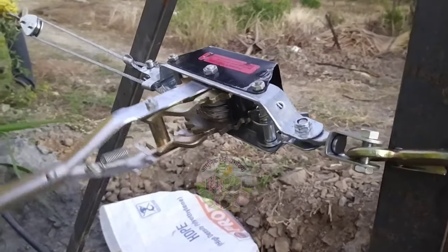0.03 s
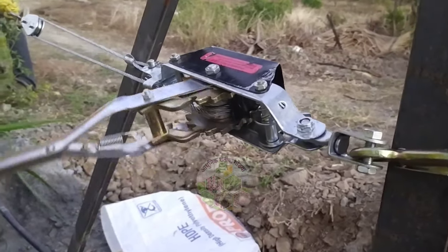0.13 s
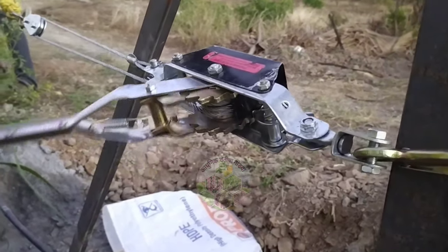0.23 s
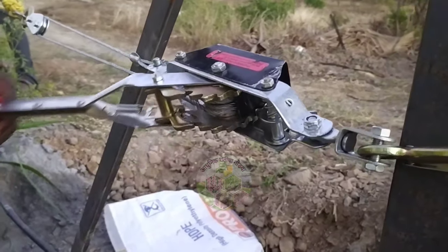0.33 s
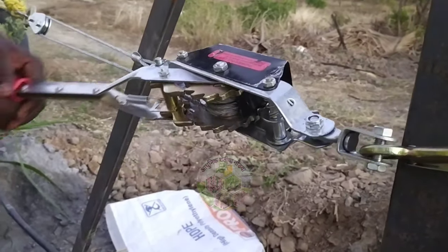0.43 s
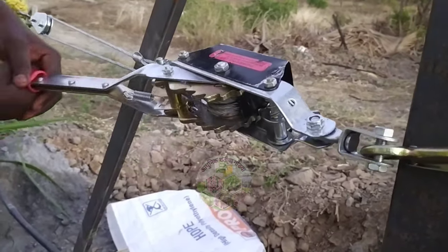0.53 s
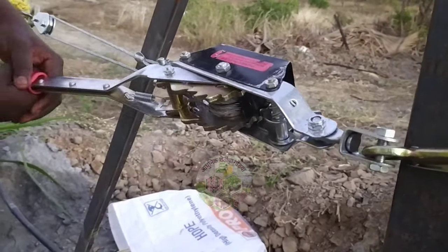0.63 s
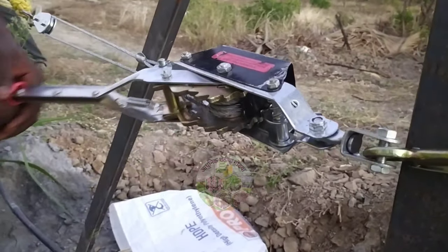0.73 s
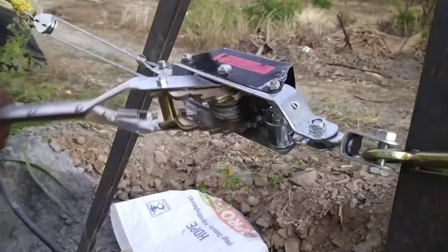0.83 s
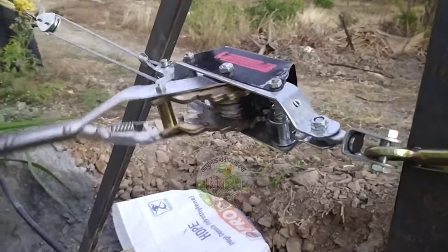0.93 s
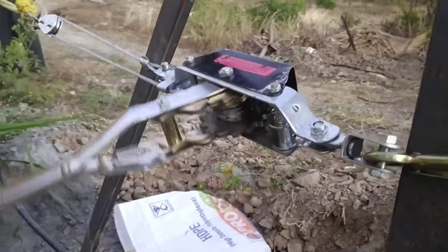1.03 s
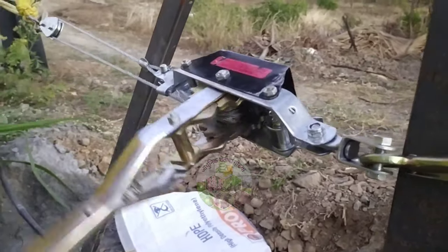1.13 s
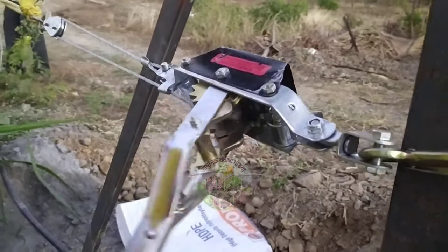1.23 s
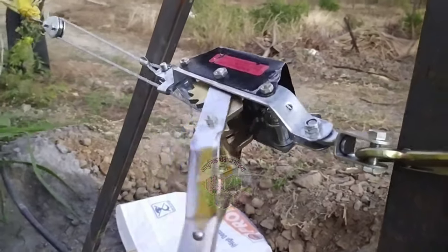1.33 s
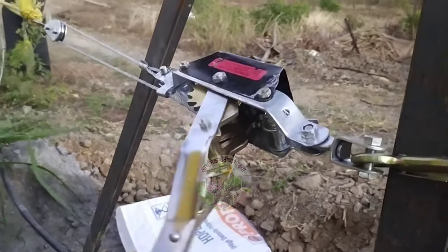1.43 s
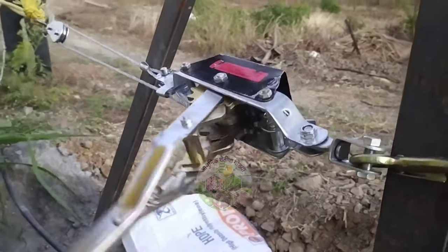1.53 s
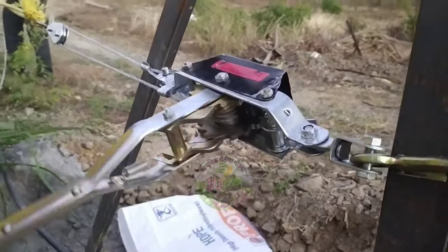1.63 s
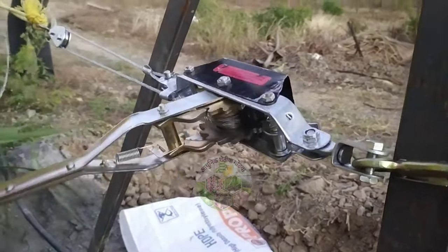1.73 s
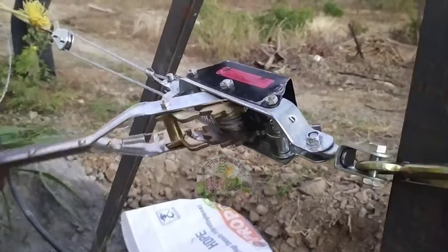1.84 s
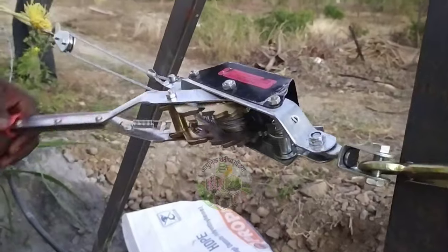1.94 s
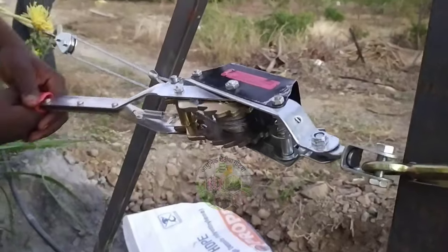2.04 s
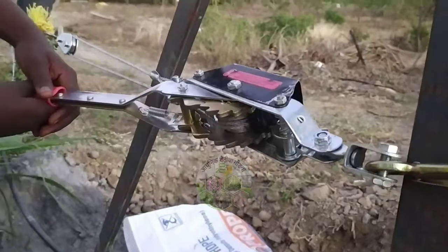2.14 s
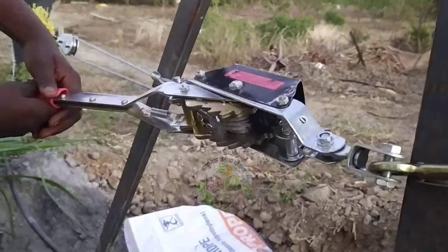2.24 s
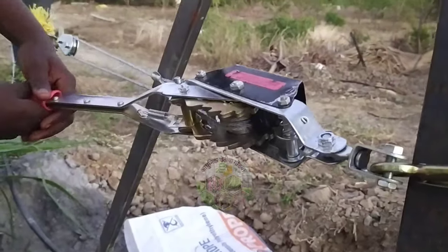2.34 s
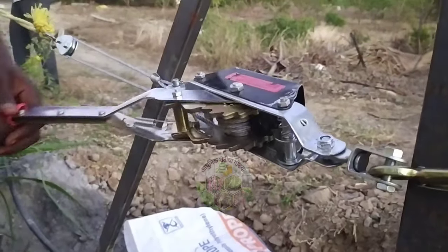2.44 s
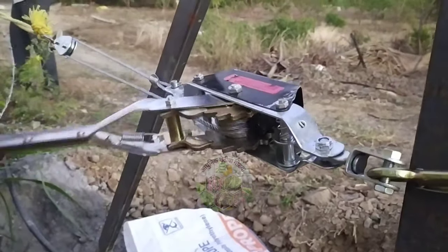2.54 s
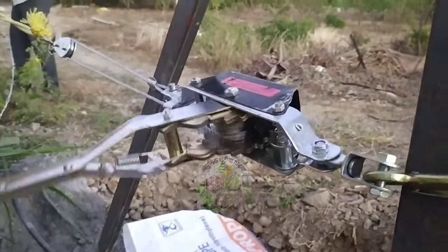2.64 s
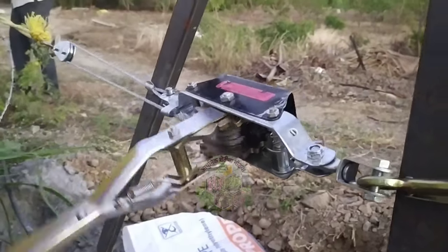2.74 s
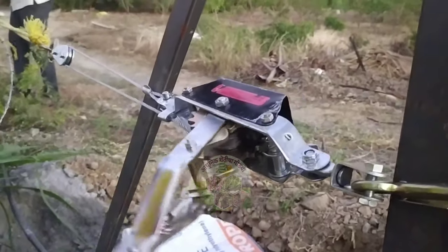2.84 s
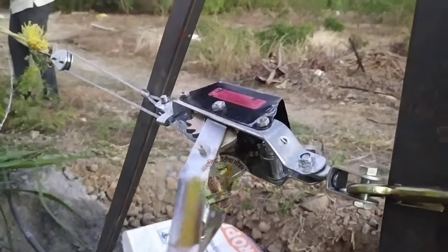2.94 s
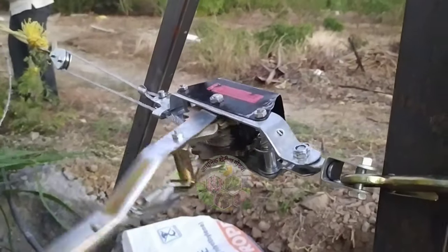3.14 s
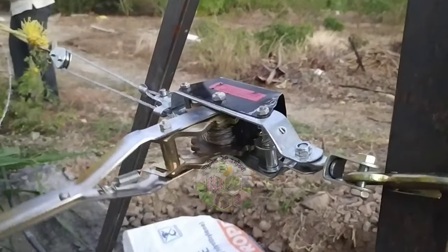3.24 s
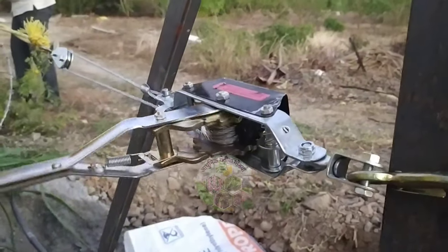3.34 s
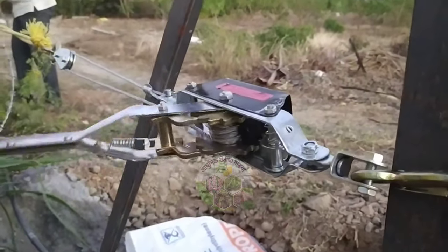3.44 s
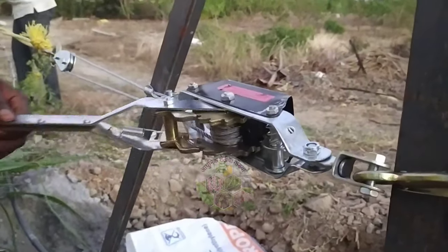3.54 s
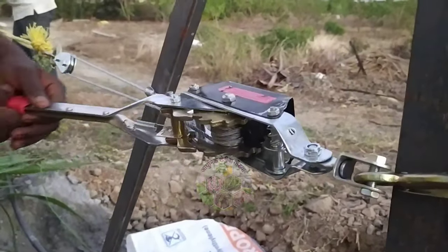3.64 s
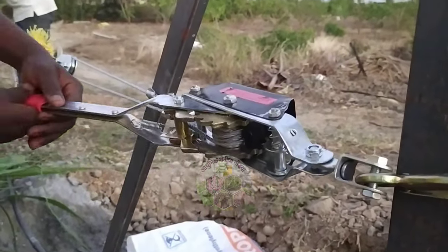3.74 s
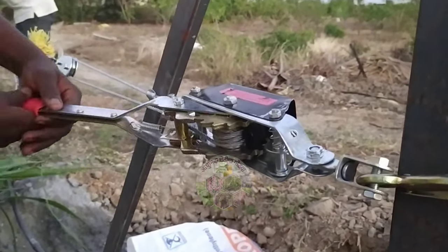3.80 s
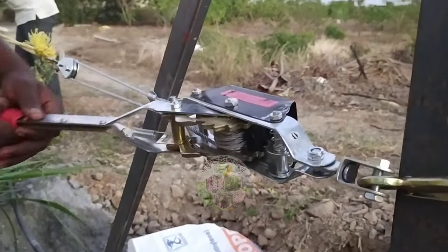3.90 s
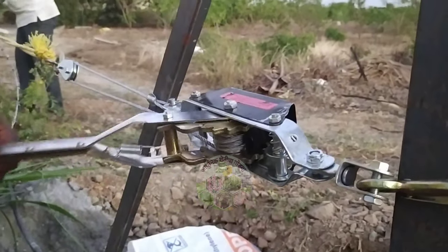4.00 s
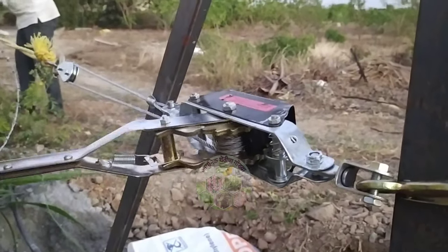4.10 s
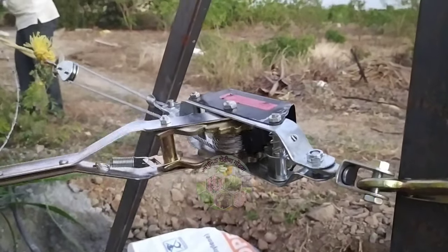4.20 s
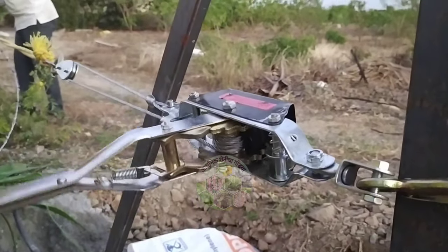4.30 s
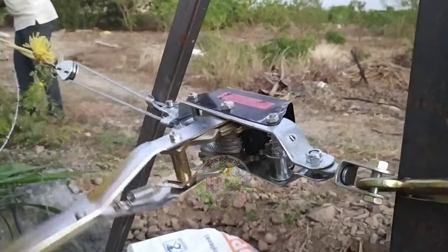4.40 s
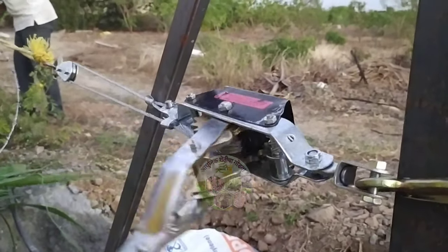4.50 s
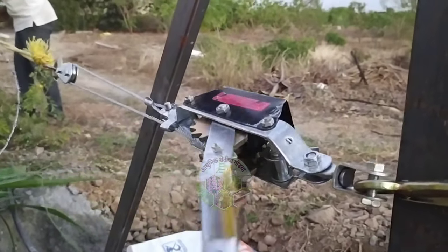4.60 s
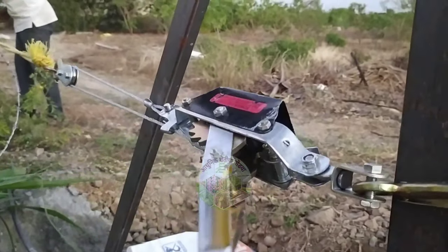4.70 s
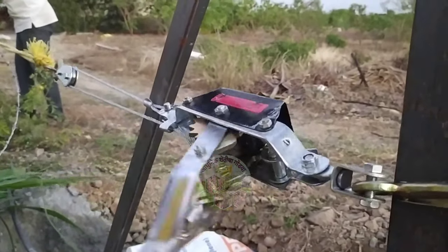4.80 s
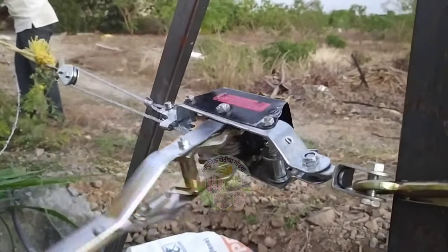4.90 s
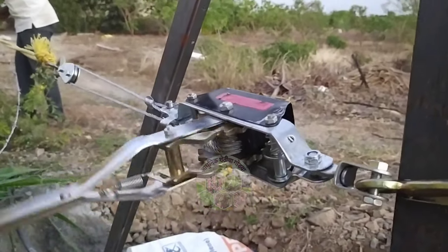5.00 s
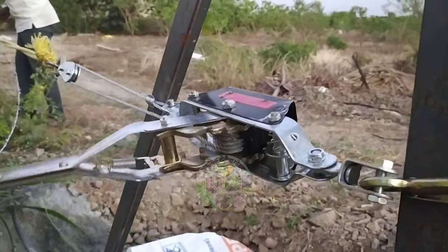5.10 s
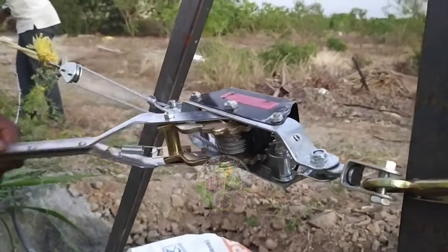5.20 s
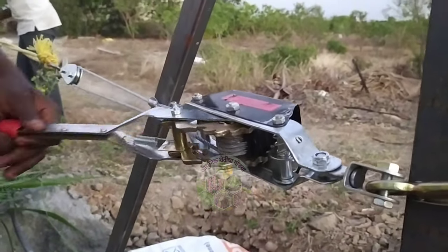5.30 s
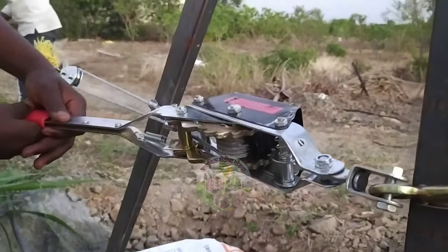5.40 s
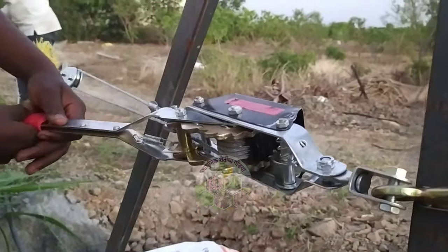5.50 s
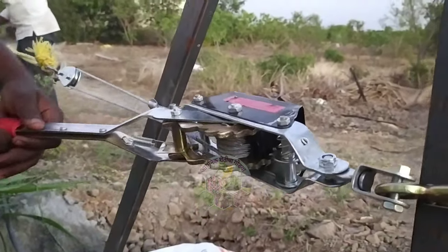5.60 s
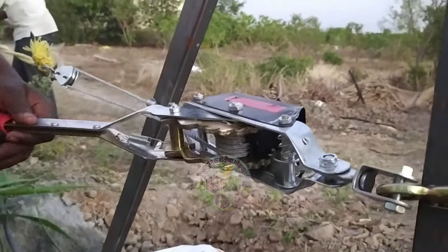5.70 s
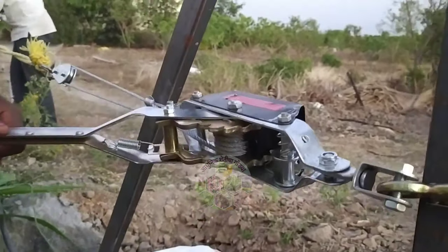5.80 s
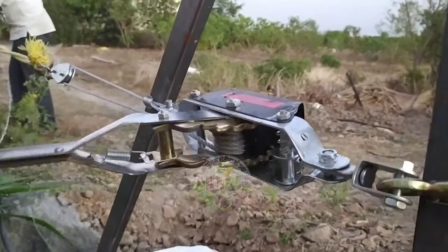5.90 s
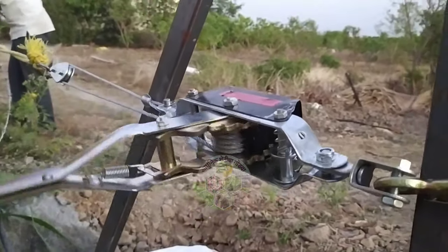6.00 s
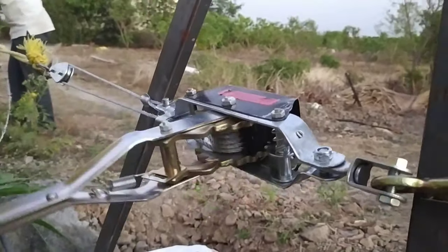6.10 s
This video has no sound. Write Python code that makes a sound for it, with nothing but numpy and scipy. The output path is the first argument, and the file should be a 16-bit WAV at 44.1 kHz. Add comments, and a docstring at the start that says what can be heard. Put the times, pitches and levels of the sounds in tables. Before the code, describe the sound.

A steel ratchet puller is worked by hand in an open, quiet field, very close to a handheld stereo microphone. Two heavy clacks at 0.1 and 0.3 s and a softer one at 0.5 open the pull; a knock follows around 0.75, then three back-stroke clicks from 1.0 to 1.2 with dull bumps and a scraping tail. A knock at 1.6 leads to pull clicks at 1.75, 1.9 and 2.1. Rasping swells before a loud, bright, ringing burst at 2.6-2.9. More rubbing, a knock at 3.2, clacks at 3.4 and 3.5, then small ticks near 3.7 and a knock at 4.06. Three back-stroke clicks ring from 4.4 to 4.6, a rattle at 4.8, and four pull clacks from 5.0 to 5.4. After a short lull, scraping returns and two strong clicks end it around 6.0. High insect chirps pulse faintly throughout, a nearer one joining after 5.6.

```python
"""Ratchet puller tightening a fence wire

A hand-cranked steel ratchet puller works in an open field, close to a hand-held camera.
Its pawls click and chatter as gritty noise bursts, while frame and wire ring as fading tones.
Filtered noise makes the scraping between clicks, and wavering tones make the lever and drum sing.
Two insects chirp in short falling tones, back-stroke clicks jolt the microphones, and the field hushes."""
import sys
import numpy as np
from scipy import signal
from scipy.fft import rfft, irfft
from scipy.io import wavfile
from scipy.ndimage import uniform_filter1d

SR = 44100
rng = np.random.default_rng(int(sys.argv[2]) if len(sys.argv) > 2 else 0)


def persist_wave(psi):
    """Save psi, clipped to +-1, as 16-bit WAV."""
    counts = np.round(np.clip(psi, -1, 1) * 32767).astype(np.int16)
    wavfile.write(sys.argv[1], SR, np.atleast_2d(counts).T)


N = 271215


def gain_of(db):
    """Turns decibels into a factor."""
    return 10 ** (np.asarray(db) / 20)


def evened(x):
    """Scales a sound to rms 1."""
    return x / np.sqrt(np.mean(x ** 2) + 1e-20)


def read(points, hz):
    """Reads a curve between its points on a log-frequency axis."""
    f, value = np.transpose(points)
    return np.interp(np.log(hz + 1), np.log(f + 1), value)


def add(mix, s, sound):
    """Adds a sound at a time in seconds, cut off where the mix ends."""
    part = mix[..., round(s * SR):][..., :sound.shape[-1]]
    part += sound[..., :part.shape[-1]]


def coloured(x, db_of):
    """Filters a sound by a rule that gives the dB at each frequency."""
    size = x.shape[-1]
    return irfft(rfft(x) * gain_of(db_of(np.fft.rfftfreq(size, 1 / SR))), size)


def step(hz, edge_hz, steep):
    """Falls from 1 below the edge to 0 above it."""
    return 1 / (1 + (hz / edge_hz) ** steep)


def drift(rate, rows):
    """Random drift, a row each: straight lines between random points of spread 1, `rate` per second."""
    knots = rng.standard_normal((rows, round(N / SR * rate) + 2))
    place = np.arange(N) / SR * rate
    return np.array([np.interp(place, np.arange(len(k)), k) for k in knots])


def smooth_patches(noise, bins, frames):
    """Smooths random numbers over neighbouring frequencies and times into patches of rms 1."""
    across = uniform_filter1d(noise, size=bins, axis=0)
    return evened(uniform_filter1d(across, size=frames, axis=1))


def patchy(x, depth_db):
    """Lifts and lowers patches of about 300 Hz by 40 ms at random."""
    z = signal.stft(x, nperseg=512, noverlap=384)[2]
    patches = smooth_patches(rng.standard_normal(z.shape[1:]), bins=4, frames=12)
    return signal.istft(z * gain_of(depth_db * patches), nperseg=512, noverlap=384)[1][:, :x.shape[1]]


def pair_noise(size, shared, grit_db):
    """Gritty noise at both microphones: a shared part, late on the left, and a part of their own."""
    late = 12  # samples by which the tool reaches the left microphone later
    common, left, right = rng.standard_normal((3, size))
    wobble = np.sqrt(12) * uniform_filter1d(rng.standard_normal(size), size=12)
    grit = gain_of(grit_db * wobble)
    own = np.sqrt(1 - shared ** 2)
    at_left = (shared * common + own * left) * grit
    at_right = (shared * common + own * right) * grit
    return np.array([np.roll(at_left, late), at_right])


def field():
    """Distant open-air hush: noise shaped in frequency, with drifting patches."""
    # colour of the hush: (frequency [Hz], relative level [dB per Hz])
    hush_colour = [(18, -30), (30, 24.5), (116, -10.5), (190, 8.5), (774, 2), (978, 4), (1600, -7),
                   (1870, -1), (2310, -20), (5300, -1.5), (7060, 5.5), (9150, -7), (15000, -54)]
    # how alike left and right are: (frequency [Hz], likeness [0 to 1])
    likeness = [(60, 0.63), (300, 0.94), (800, 0.93), (2000, 0.033), (15000, 0.088)]
    level_db = -53
    frames, hz = N // 256 + 5, np.fft.rfftfreq(1024, 1 / SR)
    a, b, c, d, noise = rng.standard_normal((5, 513, frames))
    patches = smooth_patches(noise, bins=8, frames=14)
    same = read(likeness, hz)[:, None]
    left = a + 1j * b
    right = same * left + np.sqrt(1 - same ** 2) * (c + 1j * d)
    z = np.array([left, right]) * gain_of(read(hush_colour, hz)[:, None] + 2.5 * patches)
    hush = signal.istft(z, nperseg=1024, noverlap=768)[1][:, :N]
    return gain_of(level_db) * evened(hush)


def chirp(length_s, top_hz, fall_hz):
    """One wing stroke: a short falling tone."""
    t = np.arange(round(length_s * SR)) / SR
    turn = 2 * np.pi * np.cumsum(top_hz - fall_hz * t / length_s) / SR
    return signal.windows.tukey(len(t), .7) * np.sin(turn)


def insects():
    """A steady far singer with two strong wing strokes and a weak one; a nearer one joins late."""
    # pace of the far insect: (time [s], chirp groups sung so far [count])
    far_beat = [(0.034, 0), (0.754, 11), (1.257, 19), (1.936, 29), (2.383, 36), (2.972, 45), (3.837, 58),
                (4.625, 70), (5.016, 76), (5.486, 83), (5.728, 87), (6.119, 93)]
    # its typical level on the left, faint where knocks cover it: (time [s], level [dB])
    far_level = [(0.0, -41), (1.0, -42), (1.4, -39), (3.5, -38), (3.69, -55), (3.78, -59), (3.82, -42),
                 (4.2, -41), (4.7, -38.5), (5.56, -37.5), (5.6, -64), (5.68, -60), (5.72, -38), (6.15, -43)]
    # single chirps of the near insect, on the left: (time [s], level [dB])
    near_chirps = [(5.66, -33), (5.683, -32.5), (5.758, -32), (5.846, -32.5), (5.951, -31), (6.027, -33)]
    far, near = np.zeros((2, N))
    beat_s, groups = np.transpose(far_beat)
    starts = np.interp(np.arange(groups[-1] + 1), groups, beat_s)
    levels = np.interp(starts, *np.transpose(far_level)) + 2.5 * rng.standard_normal(len(starts))
    for s, db in zip(starts, levels):
        for late_s, stroke_db in ((0, 0.5), (.0205, 0), (.04, -10)):
            add(far, s + late_s, gain_of(db + stroke_db) * chirp(0.01145, 7850, 1550))
    for s, db in near_chirps:
        add(near, s, gain_of(db) * chirp(0.012, 7900, 1740))
    right = gain_of(-10) * (np.roll(far, 1) + near)  # the right hears both more softly
    return np.array([far + near, right])


def jolts():
    """Each shock pushes the membranes back; the slow swing after it is the bass cut settling."""
    # shocks through the camera body, before the bass cut: (time [s], left level [dB], right level [dB])
    shocks = [(0.983, -18.9, -15.1), (1.112, -15.8, -12.5), (1.235, -15.7, -17.1), (2.607, -17.6, -16.0),
              (2.727, -19.5, -15.6), (2.833, -17.1, -18.9), (4.386, -22.0, -19.7), (4.512, -18.5, -15.9),
              (4.622, -18.0, -12.9), (5.974, -28.0, -14.1), (6.114, -29.9, -14.0)]
    out, t = np.zeros((2, N)), np.arange(6000) / SR
    rise_s = .0148
    push = -(t / rise_s) ** 2 * np.exp(2 - 2 * t / rise_s)
    for s, *db in shocks:
        add(out, s, gain_of(db)[:, None] * push)
    swing, leak = 2 * np.pi * 1.94, 2 * np.pi * .67  # two corners of the bass cut [radians per s]
    poles = np.exp(np.append(np.roots([1, swing, swing ** 2]), -leak) / SR)
    return signal.sosfilt(signal.zpk2sos([1, 1, 1], poles, 1), out)


def wire(size):
    """The taut wire hums on after a blow, each low mode more or less by chance."""
    # modes, levels before chance and the click's own level: (frequency [Hz], level [dB], 60 dB fall [s])
    wire_modes = [(291, -48.5, 0.48), (370, -47.5, 0.22), (586, -48, 0.45), (864, -37.5, 0.33),
                  (1148, -40.5, 0.38)]
    t = np.arange(size) / SR
    hz, db, t60 = np.transpose(wire_modes)[:, :, None]
    chance, detune = rng.standard_normal((2, len(wire_modes), 1))
    level = gain_of(db + 4.0 * chance - 60 * t / t60)
    modes = level * np.sin(2 * np.pi * hz * (1 + 0.0083 * detune) * t)
    return modes.sum(0) * (1 - np.exp(-t / 0.0096))


def frame(spread_db, detune, size):
    """Ring of all modes; grip and tooth shift strength and pitch, each microphone sees another phase."""
    # modes before chance and hand damping: (frequency [Hz], width [Hz], relative level [dB])
    frame_modes = [(1009, 43, -4), (1362, 9.5, -14), (1432, 11, -13), (1592, 11.2, -10), (1677, 17, -7.5),
                   (2316, 14.6, -6.5), (2765, 28, -3.5), (2802, 11, -20.5), (3150, 30, -19),
                   (3730, 210, -5.5), (4380, 18, -5), (4870, 10.3, -9), (5440, 210, 12), (6700, 20, -1),
                   (6700, 40, -8), (7140, 17.7, -1.5), (8750, 300, -22), (8740, 32.6, 4), (8744, 53, 11.5),
                   (10200, 36, -1), (10500, 180, -31), (10200, 170, 8), (11200, 340, -90),
                   (13400, 150, -12), (14100, 83, -51)]
    t = np.arange(size) / SR
    hz, width, db = np.transpose(frame_modes)[:, :, None]
    hz = hz * (1 + detune * rng.standard_normal(hz.shape))
    db = db + spread_db * rng.standard_normal((2, len(frame_modes), 1))
    phase = 2 * np.pi * rng.random((2, len(frame_modes), 1))
    fade = np.exp(-np.pi * width * (1 + hz / 9000) * t)  # the gripping hand damps high modes more
    return gain_of(db) * fade * np.sin(2 * np.pi * hz * t + phase)


def rub_levels(t):
    """Rub spells, some within the same lever stroke: each bites, swells, holds, then dies away."""
    # spells: (start [s], swell time [s], hold time [s], swell height [dB],
    # grind level [dB], fizz level [dB], fade [dB per s])
    spells = [(0.0, 0.3, 0.2, 0.6, -50, -52.5, 120), (0.718, 0.105, 0.025, 2.5, -43, -37, 150),
              (0.893, 0.11, 0.2, 1.5, -41, -42, 42), (1.515, 0.07, 0.06, 2.5, -41, -41, 36),
              (2.07, 0.1, 0.025, 2.5, -42, -51.5, 105), (2.336, 0.265, 0.3, 10, -40.5, -38.5, 100),
              (3.04, 0.15, 0.06, 10, -40, -37.5, 105), (3.4, 0.09, 0.07, 3, -45.5, -54, 85),
              (3.897, 0.012, 0.012, 2.5, -52, -58, 75), (3.967, 0.28, 0.27, 8, -43.5, -39.5, 70),
              (4.783, 0.21, 0.26, 1.5, -47.5, -51, 45), (5.773, 0.08, 0.15, 1.5, -39, -42, 17)]
    still_db = -60  # faint rub of the still tool
    power = np.full((2, len(t)), gain_of(still_db) ** 2)
    for start, swell, hold, swell_db, grind_db, fizz_db, fade_db in spells:
        since = t - start
        swelling_db = -swell_db * np.clip(1 - since / swell, 0, 1)
        fading_db = -fade_db * np.maximum(since - swell - hold, 0)
        level = gain_of(swelling_db + fading_db + np.array([[grind_db], [fizz_db]]))
        power += (level * (since >= 0)) ** 2
    return np.sqrt(abs(uniform_filter1d(power, size=300)))


def rubbing():
    """Uneven grains of friction drive the frame, whose modes come and go as the contact point travels."""
    # colour of the direct rub: (frequency [Hz], relative level [dB per Hz])
    scrape_colour = [(88, -71), (150, -20.5), (439, -11.5), (837, -17), (941, -11), (1560, -1.5),
                     (1790, -11.5), (2270, -2), (4240, -1), (9080, -3), (16000, -16.5)]
    grains = pair_noise(N, 0.49, grit_db=3) * gain_of(1.52 * drift(45, rows=1))
    modes = signal.oaconvolve(grains[:, None], frame(3.0, 0.021, 2000), axes=2)[..., :N]
    rings = (modes * gain_of(3.9 * drift(16, rows=modes.shape[1]))).sum(1)
    rings = coloured(rings, lambda hz: -8 * (1 - step(hz, 6500, 7.2)))  # slow rub hardly reaches high modes
    direct = coloured(grains, lambda hz: read(scrape_colour, hz))
    rub = evened(direct) + gain_of(-3.5) * evened(rings)
    rub = patchy(rub, depth_db=3.0)  # the wire bites on ever new spots
    grind = evened(coloured(rub, lambda hz: -30 * (1 - step(hz, 3870, 5.8))))  # the lower part
    # the higher part, with the very top softened
    fizz = evened(coloured(rub, lambda hz: -30 * step(hz, 1700, 1.2) - 12 * (1 - step(hz, 11000, 43))))
    grind_level, fizz_level = rub_levels(np.arange(N) / SR)
    return grind_level * grind + fizz_level * fizz


def singing():
    """The lever's and the drum's main mode sing on, wavering in pitch and strength under friction."""
    # after a drop or while the pawl slides, levels before wavering:
    # (start [s], hold [s], lever level [dB], drum level [dB])
    songs = [(0.995, 0.044, -38, -60), (1.108, 0.047, -32, -60), (1.246, 0.02, -41, -66),
             (1.764, 0.0082, -39, -36.5), (2.622, 0.03, -28.5, -60), (2.736, 0.02, -28.5, -56),
             (2.85, 0.013, -34, -62), (3.153, 0.06, -45, -50), (3.39, 0.005, -33, -24.5),
             (3.532, 0.005, -37, -47), (4.297, 0.049, -45, -58), (4.387, 0.038, -23, -50),
             (4.518, 0.018, -27.5, -56), (4.63, 0.005, -37, -58), (4.988, 0.005, -33, -31),
             (5.107, 0.012, -31.5, -31.5), (5.234, 0.0092, -31, -41), (5.79, 0.16, -45.5, -49),
             (5.989, 0.031, -26.5, -59), (6.123, 0.0083, -29, -55)]
    rise_s = 0.0068
    out, t = np.zeros((2, N)), np.arange(SR // 2) / SR
    # lever, then drum: (column, frequency [Hz], pitch waver [Hz], 60 dB fall [s])
    for column, hz, waver_hz, t60 in ((0, 1603, 30.2, 0.12), (1, 1009, 6, 0.23)):
        pitch, left, right, shift = drift(110, rows=4)
        turn = 2 * np.pi * np.cumsum(hz + waver_hz * pitch) / SR
        at_left = gain_of(4 * left) * np.sin(turn)
        at_right = gain_of(4 * right) * np.sin(turn + 1.5 + .5 * shift)
        level = np.zeros(N)
        for s, hold, *db in songs:
            fall_db = 60 * np.maximum(t - rise_s - hold, 0) / t60
            add(level, s, np.minimum(t / rise_s, 1) * gain_of(db[column] - fall_db))
        out += level * np.sqrt(2) * np.array([at_left, at_right])
    return out


def click(level_db, weight_db, thud_db, sparkle_db, ring_db, t60, rise, pan_db):
    """A bounce on steel: a gritty burst, a slower heavy part, a ragged rattle, frame and wire ringing."""
    # colour of steel on steel: (frequency [Hz], relative level [dB per Hz])
    steel_colour = [(59, -71), (100, -16.5), (535, -16.5), (991, -15), (1680, -11), (2000, -10), (2800, -6),
                    (3940, -8.5), (5420, -3), (6020, 0.5), (7290, -6.5), (8830, 4), (11400, -13),
                    (14700, -13.5), (16000, -70)]
    t = np.arange(9000) / SR
    bounces = gain_of(4.7 * np.repeat(rng.standard_normal(len(t) // 60), 60))
    shape = (1 - np.exp(-t / rise)) * gain_of(-60 * t / t60)
    # bouncing shares out the same energy
    shape *= bounces * np.linalg.norm(shape) / np.linalg.norm(shape * bounces)
    slow = (1 - np.exp(-t / (rise + 0.0024))) ** 2 * gain_of(5.5 - 60 * t / (1.172 * t60))

    # countless small modes dent the colour
    dents_db = 4 * evened(uniform_filter1d(rng.standard_normal(len(t) // 2 + 1), size=24))
    noise = pair_noise(len(t), 0.54, grit_db=3.5)
    bright = coloured(noise, lambda hz: read(steel_colour, hz) + dents_db * (1 - step(hz, 760, 4.6)))
    bright = evened(bright)
    bright *= np.linalg.norm(shape) / np.linalg.norm(shape * bright, axis=1, keepdims=True)
    # low-mid weight, deep thud and treble sparkle
    hit = coloured(bright, lambda hz: (weight_db + 19) * step(hz, 2630, 5.0)
                   + (thud_db - weight_db + 28.5) * step(hz, 666, 18.0)
                   + (sparkle_db + 19.5) * (1 - step(hz, 12500, 8.4)))
    heavy = coloured(hit, lambda hz: 20 * np.log10(step(hz, 4700, 1.4)))

    ragged = gain_of(3.15 * np.repeat(rng.standard_normal(len(t) // 200), 200))  # loose parts touching
    rattle = coloured(hit[:, ::-1] * ragged, lambda hz: -14 - 9 * (1 - step(hz, 4900, 24)))
    rattle *= gain_of(-60 * t / 0.18) * (1 - np.exp(-t / 0.0018))
    ring = frame(3.2, 0.0201, len(t)).sum(1) * (1 - np.exp(-t / rise)) * ragged
    sound = (hit - heavy) * shape + heavy * slow + rattle + gain_of(ring_db) * ring + wire(len(t))
    return gain_of(level_db + 0.5 + np.array([[.5], [-.5]]) * pan_db) * sound


def knocks():
    """Slack is taken up and loose parts knock: clicks of many strengths and lengths."""
    # settings for click(): (time [s], level [dB], weight [dB], sparkle [dB], chatter 60 dB fall [s], rise [s])
    knock_list = [(0.3873, -35, -17, -47, 0.032, 0.0025), (0.4989, -22.5, -14, -22, 0.21, 0.0066),
                  (0.719, -24, -8.5, -52, 0.063, 0.0049), (0.7553, -17, -19, -55, 0.023, 0.00075),
                  (1.5246, -31.5, -6, -27, 0.068, 0.0029), (1.599, -13, -23, -38, 0.051, 0.0014),
                  (1.85, -27.5, -14, -52, 0.033, 0.0015), (1.877, -32, -3, -28, 0.092, 0.0012),
                  (2.0911, -21.5, -19.5, -12, 0.1, 0.0023), (2.3366, -32.5, -2, -36, 0.05, 0.0024),
                  (2.379, -22.5, -6, -38, 0.068, 0.008), (2.44, -27.5, -40, -33, 0.14, 0.0074),
                  (2.703, -6, -37, -27, 0.023, 0.00077), (2.816, -8.5, -30, -25, 0.071, 0.0049),
                  (2.889, -20.5, -15, -30, 0.027, 0.002), (3.039, -27, -45, -27, 0.035, 0.0012),
                  (3.2034, -13, -19.5, -56, 0.061, 0.0016), (3.6516, -22, -69, -29, 0.03, 0.00076),
                  (3.673, -24.5, -40, -27, 0.035, 0.00084), (3.7038, -26, -39, -23, 0.041, 0.00067),
                  (3.7347, -26.5, -29, -32, 0.069, 0.00082), (3.7895, -27.5, -18, -24, 0.048, 0.00081),
                  (4.0603, -10, -14, -55, 0.05, 0.0054), (4.4386, -21.5, -33, -22, 0.03, 0.0009),
                  (4.494, -22, -9, -21, 0.024, 0.005), (4.5871, -28.5, -6, -19, 0.028, 0.0031),
                  (4.794, -13.5, -33, -37, 0.044, 0.00077), (4.812, -18, -30, -27, 0.039, 0.00055),
                  (4.8635, -29, -33, -27, 0.04, 0.0018), (4.901, -34, -13, -19, 0.076, 0.0016),
                  (4.973, -23, -46, -18, 0.06, 0.0021), (5.5505, -31, -1, -38, 0.11, 0.0047),
                  (5.5753, -26, -11, -43, 0.068, 0.0069), (5.9332, -27.5, -4, -13, 0.047, 0.0015)]
    out = np.zeros((2, N))
    for s, db, weight_db, sparkle_db, t60, rise in knock_list:
        add(out, s, click(db, weight_db, -50.5, sparkle_db, -18, t60, rise, pan_db=4))
    return out


def lever_pawl_drops():
    """On the back stroke the lever pawl drops from tooth to tooth."""
    # settings for click(): (time [s], level [dB], thud [dB], chatter 60 dB fall [s], rise [s])
    back_drops = [(0.9785, -12, -32.5, 0.072, 0.0015), (1.1068, -10.5, -33.5, 0.058, 0.0022),
                  (1.2303, -11.5, -34.5, 0.071, 0.0016), (2.6026, -10, -31.5, 0.06, 0.00063),
                  (2.7213, -11.5, -32, 0.055, 0.0015), (2.8314, -6, -37.5, 0.041, 0.0006),
                  (4.3817, -11.5, -35, 0.069, 0.0019), (4.5077, -10, -36.5, 0.06, 0.0018),
                  (4.6187, -10, -38.5, 0.064, 0.00086), (5.9711, -7.5, -34, 0.054, 0.0015),
                  (6.1106, -6.5, -36, 0.056, 0.0026)]
    out = np.zeros((2, N))
    for s, db, thud_db, t60, rise in back_drops:
        add(out, s, click(db, -5.5, thud_db, -19, -12, t60, rise, pan_db=2))
    return out


def holding_pawl_drops():
    """While the lever pulls, the holding pawl drops behind each tooth."""
    # settings for click(): (time [s], level [dB], weight [dB], thud [dB], chatter 60 dB fall [s], rise [s])
    pull_drops = [(0.1276, -2.5, -16, -50.5, 0.056, 0.005), (0.2776, -8.5, -16, -54, 0.048, 0.0015),
                  (0.5204, -12, -32, -52.5, 0.081, 0.0014), (1.7481, -6, -20.5, -48.5, 0.046, 0.0025),
                  (1.8888, -6.5, -17, -57.5, 0.053, 0.0028), (2.1091, -13, -35, -62, 0.067, 0.0065),
                  (3.3856, -6, -15, -53, 0.046, 0.00087), (3.5228, -9.5, -14, -53, 0.056, 0.0011),
                  (4.9847, -5, -16, -55, 0.033, 0.00093), (5.1015, -9, -10, -54, 0.044, 0.0011),
                  (5.223, -8.5, -12, -54.5, 0.047, 0.00079), (5.4075, -8.5, -16.5, -60, 0.069, 0.0019)]
    out = np.zeros((2, N))
    for s, db, weight_db, thud_db, t60, rise in pull_drops:
        add(out, s, click(db, weight_db, thud_db, -18.5, -15, t60, rise, pan_db=2))
    return out


def scene():
    """Adds up field, insects, shocks and tool."""
    background = field() + insects() + jolts()
    clicks = knocks() + lever_pawl_drops() + holding_pawl_drops()
    return background + rubbing() + singing() + clicks


def record(dry):
    """Soft overload that rounds off the highest peaks, then the upper band limit."""
    edge_hz = 16500
    held = dry / (1 + (abs(dry) / .9) ** 4) ** .25
    low_pass = signal.firwin(511, edge_hz, window=("kaiser", 10), fs=SR)
    return signal.oaconvolve(held, low_pass[None], "same")


dry = scene()
out = record(dry)
persist_wave(out)
```